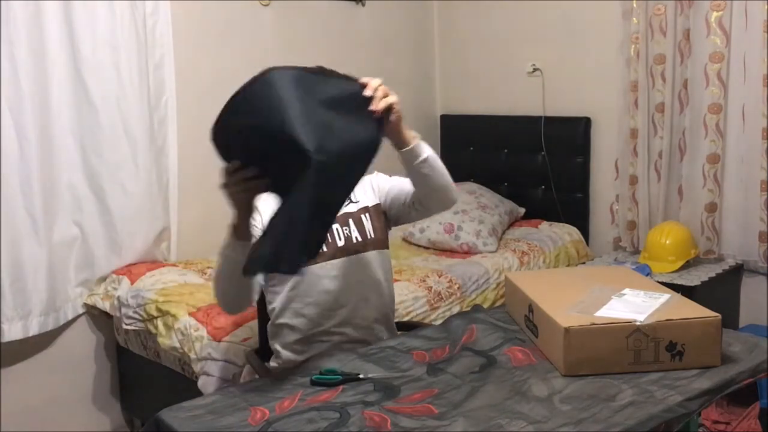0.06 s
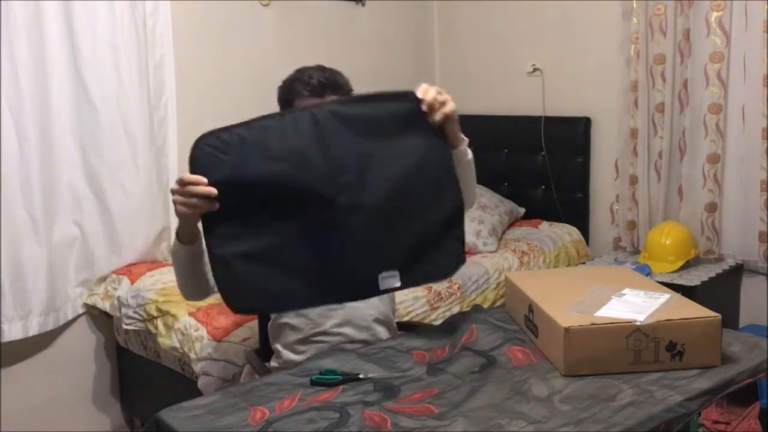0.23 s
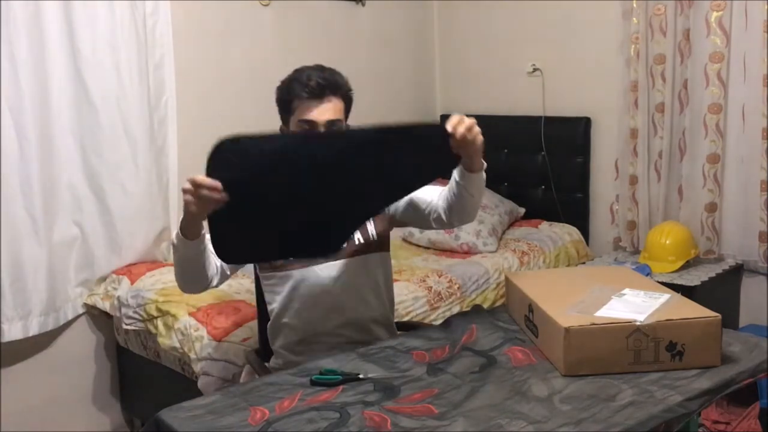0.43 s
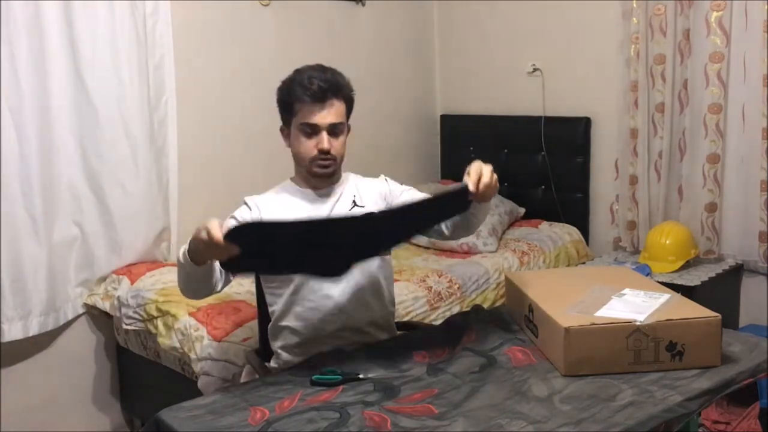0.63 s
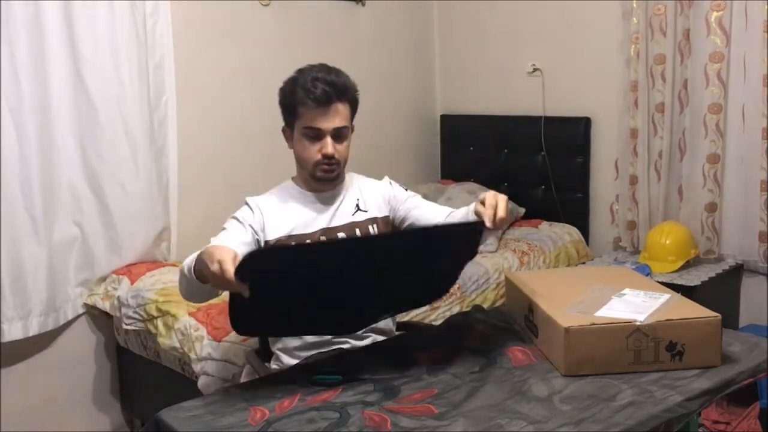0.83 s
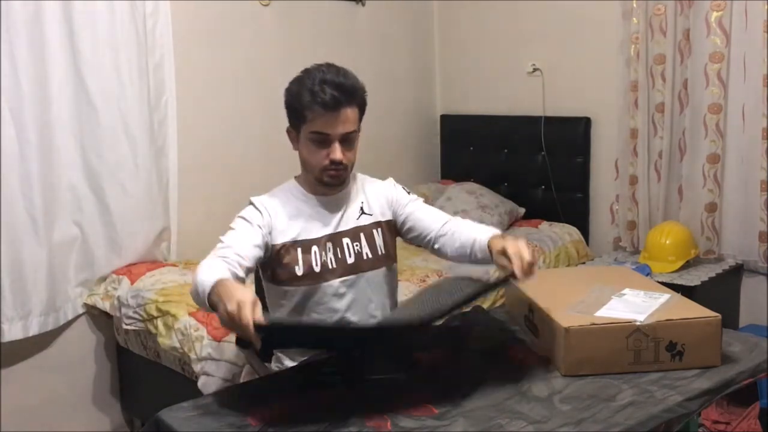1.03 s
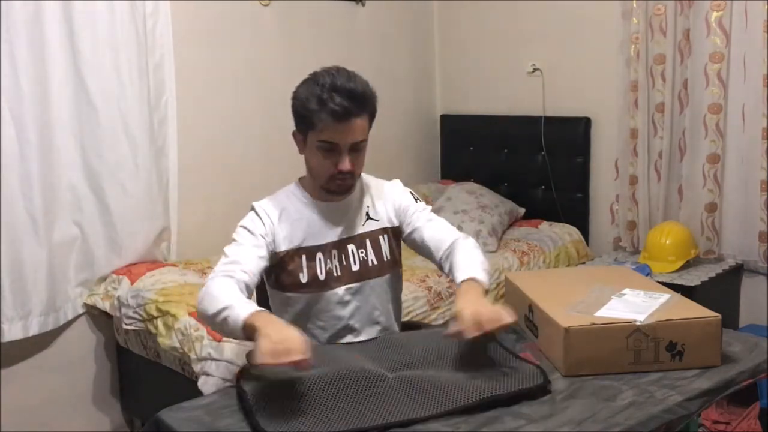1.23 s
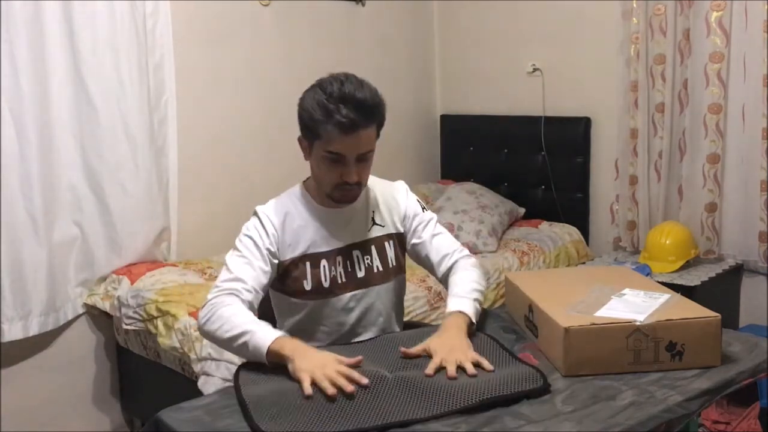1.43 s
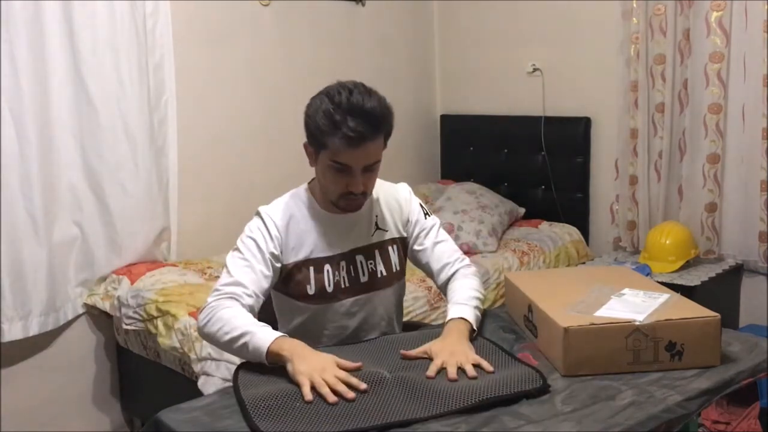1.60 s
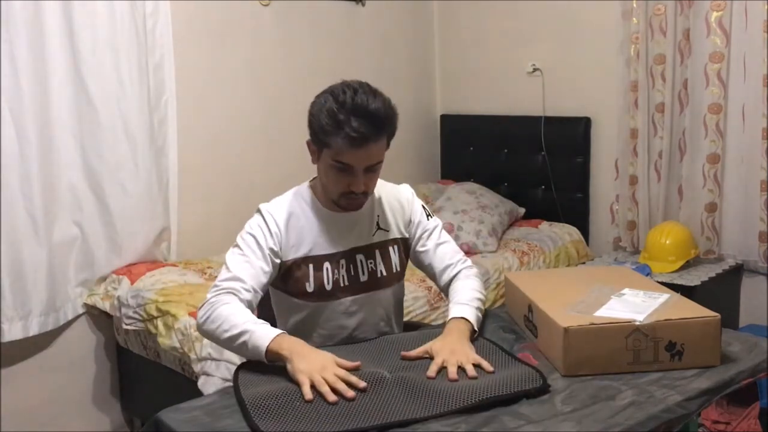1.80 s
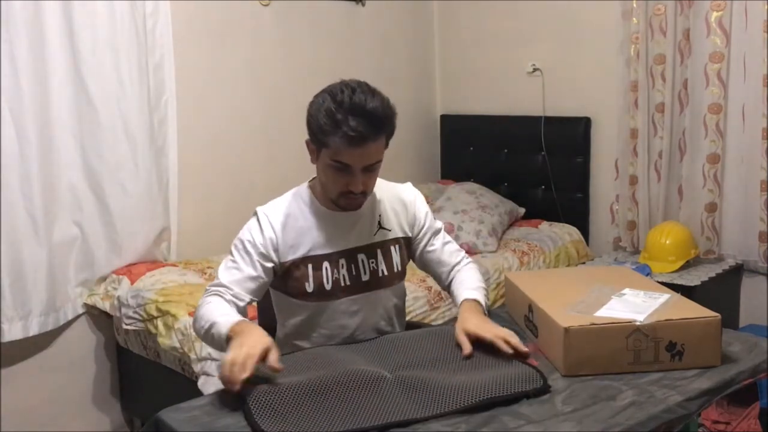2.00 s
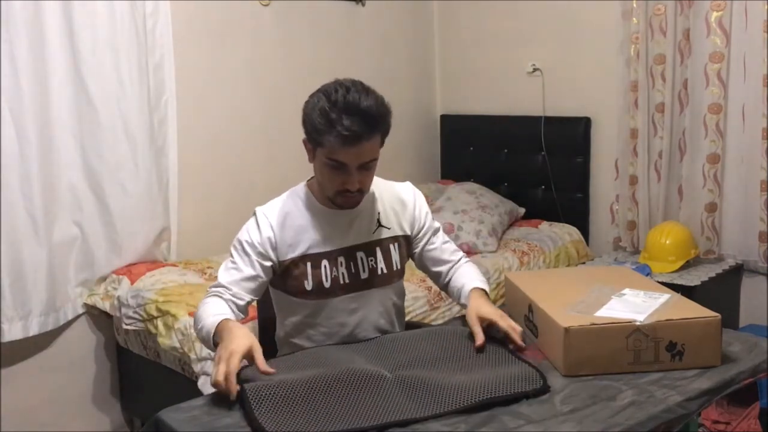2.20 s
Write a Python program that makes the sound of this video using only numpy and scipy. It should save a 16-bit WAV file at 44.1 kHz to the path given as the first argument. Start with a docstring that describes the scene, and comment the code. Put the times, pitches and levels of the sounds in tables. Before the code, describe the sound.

A stiff fabric mat is flapped open with a sharp snap and a low whoosh at about 0.2 seconds, then flops back softly around 0.4. After faint thumps, it slaps onto a table at 1.3 seconds. Hands pat it flat near 1.6 and more lightly at 2 seconds, with soft rustling. The blows echo briefly in a small bedroom, over a faint hum and hiss.

```python
"""A stiff fabric mat is flapped open in a small bedroom, lowered, slapped onto a table and patted flat.
Each blow is a short push of air that the walls throw back. In between, the cloth swishes through
the air, rustles as it slides and creases, ticks at its hem and gives a few soft thumps.
Behind it all are a faint drone and a soft hiss."""
import sys
import numpy as np
from scipy import signal
from scipy.fft import rfft, irfft
from scipy.io import wavfile

SR = 44100
rng = np.random.default_rng(int(sys.argv[2]) if len(sys.argv) > 2 else 0)


def persist_wave(psi):
    """Save psi, clipped to +-1, as 16-bit WAV."""
    counts = np.round(np.clip(psi, -1, 1) * 32767).astype(np.int16)
    wavfile.write(sys.argv[1], SR, np.atleast_2d(counts).T)


N = 103635

# echoes from surfaces near the table top (delay [s], gain [factor])
TABLE_ECHOES = [(.0013, 0.14), (.0036, 0.34), (.0062, 0.32), (.0144, .3)]


def mat_flap():
    """The mat snaps taut and gives the air one sharp push."""
    # the snap (time [s], level [dB], spread in time [s])
    flaps = [(.2024, -1.5, 0.000046)]
    # its tone colour (frequency [Hz], level [dB])
    colour = [(22, -40), (45, -22), (100, -7), (190, -2), (370, -2), (680, 0.5), (1000, 1.5), (1500, 0.5),
              (1900, -8.5), (2300, -15.5), (2900, -15.5), (4000, -21.5), (5200, -28.5), (8000, -37),
              (16000, -50)]
    # walls and table answering the raised mat (delay [s], gain [factor])
    echoes = [(.0022, 0.6), (.0038, 0.13), (.0064, 0.36), (.0077, 0.91), (0.0103, 0.55), (0.0121, 0.86),
              (0.0166, 0.72), (0.0219, 0.37), (0.0259, 0.37)]
    return blows(flaps, colour, room_db=5.5, echoes=echoes)


def mat_slap():
    """The mat lands on the table part by part, squeezing out trapped air with a crack."""
    # landings (time [s], level [dB], spread in time [s], brightness [dB per octave], crack [dB])
    slaps = [(1.2055, -24, 0.0011, 0.5, -20), (1.2080, -20.5, 0.00022, 12.5, 23),
             (1.2087, -15.5, 0.00037, -4.5, -1), (1.236, -24, 0.00017, -16.5, -23),
             (1.2970, -17, 0.003, 5.5, 19), (1.3005, -6.5, 0.00067, 0, -25),
             (1.3042, 1.5, 0.00032, -2.5, 10), (1.3065, -20, .003, 4.5, -9), (1.318, -7.5, 0.0012, -4, -30),
             (1.334, -6, 0.0034, -1.5, -32), (1.3455, -8, 0.0026, 4.5, -37)]
    # their tone colour (frequency [Hz], level [dB])
    colour = [(30, -17), (80, -20.5), (160, -4.5), (250, -6.5), (370, -2), (550, 0), (750, 1.5), (1150, 6),
              (1700, -0.5), (2400, -6), (3000, -6), (4000, -11.5), (5200, -18), (6800, -24.5), (9000, -31),
              (16000, -43)]
    return blows(slaps, colour, room_db=2, echoes=TABLE_ECHOES)


def pats():
    """Light blows: the mat flops back, and later hands pat it flat."""
    # touches (time [s], level [dB], spread in time [s], brightness [dB per octave])
    touches = [(.3678, -21.5, 0.000073, -4.5), (.4070, -18.5, 0.0014, 1), (.435, -24.5, 0.00062, 0),
               (1.576, -36.5, 0.00026, 1.5), (1.585, -28.5, 0.0066, -2), (1.5965, -20, .003, 1),
               (1.6105, -16.5, 0.00034, 1.5), (1.617, -19.5, 0.0028, 3), (1.631, -35, 0.0018, -8),
               (1.647, -28, .004, -2), (1.692, -31, 0.0017, 2.5), (1.738, -31, 0.011, 1),
               (2.009, -30, .002, -6.5), (2.018, -29, 0.0021, -4.5)]
    # their tone colour (frequency [Hz], level [dB])
    colour = [(40, -43), (150, 6.5), (400, 2.5), (800, 0), (1300, 4), (2400, -5), (4000, -6.5),
              (5000, -17.5), (8000, -24.5), (16000, -36)]
    return blows(touches, colour, room_db=-1.5, echoes=TABLE_ECHOES)


def hem_ticks():
    """The mat's hem makes tiny, bright ticks."""
    # ticks (time [s], level [dB], spread in time [s])
    ticks = [(.1835, -35, .0005), (.2021, -22.5, 0.00037), (.4072, -37.5, 0.00046), (.5462, -43, 0.0004),
             (2.3218, -28.5, 0.00028)]
    # their tone colour (frequency [Hz], level [dB])
    colour = [(100, -8), (1000, -5), (2500, -4), (6000, 0.5), (10000, -6), (16000, -27)]
    return blows(ticks, colour, room_db=-3)


def thumps(rise_s=0.0013):
    """The mat thumps as it swings and meets the table: low tones that die away fast."""
    # soft knocks (time [s], level [dB], pitch [Hz], time to fade by 60 dB [s])
    knocks = [(0.405, -15.5, 265, 0.11), (0.499, -24, 166, 0.058), (.523, -21.5, 153, 0.067),
              (.907, -22.5, 170, 0.028), (0.945, -20.5, 148, 0.1), (1.77, -25, 130, 0.017),
              (2.016, -22, 387, 0.086)]
    out, t = np.zeros(N), np.arange(SR // 4) / SR
    for start, db, hz, fade_s in knocks:
        envelope = amp(-60 * t / fade_s) * (1 - np.exp(-t / rise_s))
        swing = np.sin(2 * np.pi * hz * t) * envelope
        add(out, start, amp(db) * swing / np.linalg.norm(swing))
    return out


def rustle(creases_per_s=900):
    """Tiny creases click over the smooth rubbing of the weave."""
    # cloth sliding and creasing (time [s], level [dB])
    loudness = [(0, -63.5), (.15, -64), (.19, -51.5), (.24, -56.5), (.35, -59.5), (.42, -57), (.48, -63.5),
                (.54, -64), (.6, -73.5), (.8, -76.5), (.98, -71), (1.19, -69.5), (1.27, -59.5),
                (1.55, -76.5), (1.63, -60), (1.7, -68.5), (1.75, -63.5), (1.82, -73), (1.96, -73.5),
                (2.0, -65), (2.08, -70), (2.19, -75.5), (2.27, -65.5), (2.35, -66.5)]
    # its tone colour (frequency [Hz], level [dB])
    colour = [(50, -20), (200, -5), (500, -4.5), (1200, 11), (2200, 4), (3800, 0), (5500, -4), (9000, -5.5),
              (10500, -10.5), (12500, -5.5), (16000, -18)]
    sizes = amp(-3 * np.minimum(rng.exponential(1, N), 4))  # spread over 12 dB
    signs = rng.choice([-1, 1], N)
    creases = sizes * signs * (rng.random(N) < creases_per_s / SR)
    rubbing = rng.standard_normal(N)
    return level(loudness) * tint(unit(creases) + rubbing, colour)


def swish():
    """Air swirls around the swinging mat with a low whoosh."""
    # air pushed by the mat (time [s], level [dB])
    loudness = [(0, -77), (.14, -61), (.175, -45.5), (.2, -42), (.25, -32), (.32, -43.5), (.38, -48),
                (.43, -49), (.5, -51), (.58, -55), (.68, -67), (.8, -69.5)]
    # its tone colour (frequency [Hz], level [dB])
    colour = [(15, -54), (26, -26), (42, 1), (70, -11.5), (95, -10), (160, 0.5), (300, -1), (600, -2.5),
              (1200, -5.5), (2200, -26.5), (8000, -47)]
    return level(loudness) * tint(rng.standard_normal(N), colour)


def drone():
    """The steady noise of the still room, humming near 72 and 122 Hz."""
    # its tone colour (frequency [Hz], level [dB])
    colour = [(20, -23), (35, -12.5), (55, -0.5), (72, 6.5), (92, -25), (122, 4), (170, -8), (250, -13.5),
              (350, -34), (500, -43.5), (750, -15), (1080, -6), (1450, -13), (2300, -29), (4000, -35),
              (7000, -39.5), (9000, -37), (10500, -40), (12500, -40), (16000, -42)]
    return amp(-59.5) * tint(rng.standard_normal(N), colour)


def hiss():
    """A soft, dull hiss that wavers and fades."""
    # its rise and fall (time [s], level [dB])
    loudness = [(0, -57.5), (.15, -57.5), (.5, -64), (.8, -60.5), (1.12, -61.5), (1.5, -68), (2.35, -79)]
    # its tone colour (frequency [Hz], level [dB])
    colour = [(400, 6), (800, -8.5), (1050, 0), (1400, -8.5), (2000, -35), (5000, -74)]
    return level(loudness) * tint(rng.standard_normal(N), colour)


def blows(rows, colour, room_db, echoes=()):
    """Each blow arrives directly, as any nearby echoes, and with its own reverberation."""
    out, ring = np.zeros(N), room_ring()
    for start, db, spread_s, *tone in rows:
        touch = contacts(spread_s)
        arrivals = amp(room_db) * reverberation(ring)
        add(arrivals, 0, touch)
        for delay, gain in echoes:
            add(arrivals, delay, gain * touch)
        add(out, start, amp(db) * signal.fftconvolve(arrivals, air_push(colour, *tone)))
    return out


def air_push(colour, brightness_db=0, crack_db=-100, size=4096):
    """One short push of air, of energy 1; squeezed-out air adds a peak heard as a crack."""
    crack_hz, crack_width_hz = 1810, 280
    hz = abs(np.fft.fftfreq(size, 1 / SR))
    octaves = np.log2(np.clip(hz, 250, 12000) / 1000)
    crack = 1 + 2 * amp(crack_db) / (1 + ((hz - crack_hz) / crack_width_hz) ** 2)
    log_gain = np.log(crack * amp(read(colour, hz) + brightness_db * octaves))
    spectrum = np.exp(np.conj(signal.hilbert(log_gain)))  # packs the sound at the pulse's start
    pulse = np.fft.ifft(spectrum).real[:size // 2]
    return pulse / np.linalg.norm(pulse)


def contacts(spread_s, scuff_s=0.00047, size=2048):
    """One clean hit plus a scatter of small ones, which take over in blows longer than scuff_s."""
    hits = rng.standard_normal(size) * np.exp(-np.arange(size) / SR / abs(spread_s))
    hits *= spread_s / scuff_s / np.linalg.norm(hits)
    hits[0] += 1
    return hits / np.linalg.norm(hits)


def bedroom(x, room_db):
    """A sound plus its reverberation."""
    return x + amp(room_db) * signal.fftconvolve(x, reverberation(room_ring()))[:N]


def room_ring():
    """The air between the walls rings at its own pitches and dies away."""
    # room tones (pitch [Hz], level [dB], time to fade by 60 dB [s])
    tones = [(121.9, -5, 1), (182.5, -2, 0.23), (257.6, -13.5, 0.41), (364.6, 1.5, 0.28), (446, -2.5, 0.23),
             (547, -5, 0.33), (602, -4, 0.24), (668.4, 5.5, 0.25), (885, -16.5, 0.2), (932.5, 5, 0.16),
             (1048, -0.5, 0.26), (1115, -0.5, 0.24), (1148, 4.5, 0.11), (1622, -14, 0.083)]
    t = np.arange(SR // 2) / SR
    return unit(sum(amp(db - 60 * t / fade_s) * np.sin(2 * np.pi * (hz * t + rng.random()))
                    for hz, db, fade_s in tones))


def reverberation(ring, ring_db=-8.5, gap_s=0.0019, build_s=0.0038):
    """Countless wall echoes blur into fading noise, blended with the room's ring; energy 1."""
    # how long the room holds sound (frequency [Hz], time to fade by 60 dB [s])
    fade_times = [(100, 0.56), (260, 0.5), (700, 0.31), (1800, 0.25), (5000, 0.27), (15000, 0.2)]
    t = np.arange(len(ring)) / SR
    hz, times, bands = signal.stft(rng.standard_normal(len(t)), SR, nperseg=256)
    fade = amp(-60 * times / read(fade_times, hz)[:, None])
    tail = signal.istft(bands * fade, SR)[1][:len(t)]
    build_up = np.clip((t - gap_s) / build_s, 0, 1)
    response = (unit(tail) + amp(ring_db) * ring) * build_up
    return response / np.linalg.norm(response)


def amp(db):
    """Turns decibels into a gain factor."""
    return 10 ** (np.asarray(db) / 20)


def unit(x):
    """Scales a sound to an average strength (rms) of 1."""
    return x / np.sqrt(np.mean(x ** 2) + 1e-20)


def read(points, hz):
    """Looks up a table between its rows, with octaves evenly spaced."""
    frequencies, values = np.transpose(points)
    return np.interp(np.log(hz + 1), np.log(frequencies + 1), values)


def level(points):
    """Gain over time from rows of (time [s], level [dB])."""
    return amp(np.interp(np.arange(N) / SR, *np.transpose(points)))


def add(mix, start_s, sound):
    """Mixes a sound in at the given time."""
    part = mix[max(round(start_s * SR), 0):][:len(sound)]
    part += sound[:len(part)]


def tint(x, colour):
    """Gives a steady sound a tone colour, at an average strength of 1."""
    gains = amp(read(colour, np.fft.rfftfreq(N, 1 / SR)))
    return unit(irfft(rfft(x) * gains, N))


def scene():
    """The mat and the hands, heard across the bedroom."""
    hits = mat_flap() + mat_slap() + pats() + hem_ticks()
    handling = bedroom(thumps(), room_db=-10) + bedroom(rustle(), room_db=-6.5)
    return (hits + handling + swish() + drone() + hiss())[None]


def record(dry, low_cut_hz=34, high_cut_hz=15900):
    """Takes away the deepest rumble and the highest treble."""
    low_cut = signal.butter(N=3, Wn=low_cut_hz, btype="high", fs=SR, output="sos")
    high_cut = signal.firwin(511, high_cut_hz, window=("kaiser", 8), fs=SR)
    return signal.oaconvolve(signal.sosfilt(low_cut, dry), high_cut[None], "same")


dry = scene()
out = record(dry)
persist_wave(out)
```